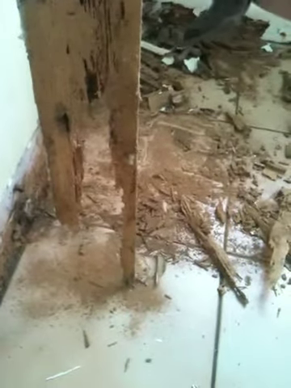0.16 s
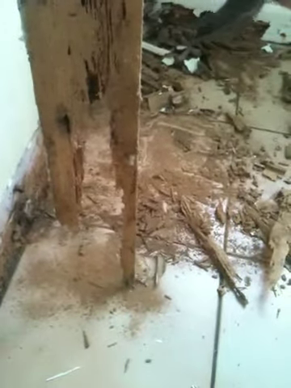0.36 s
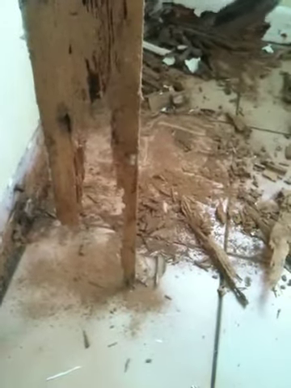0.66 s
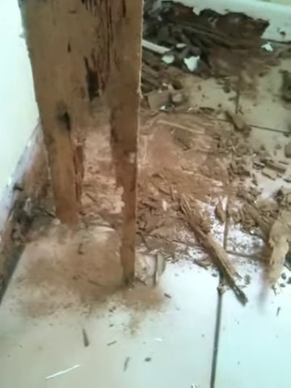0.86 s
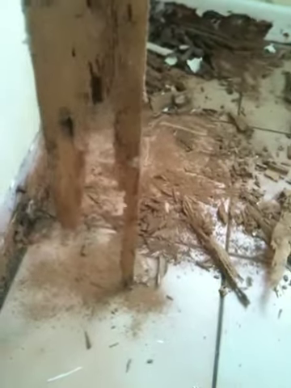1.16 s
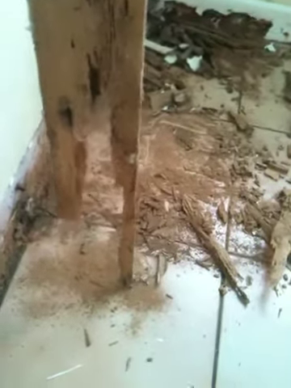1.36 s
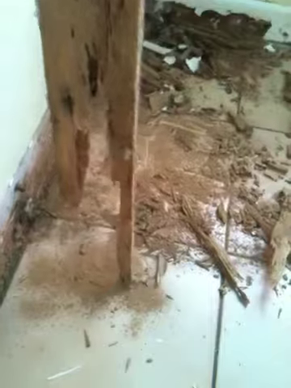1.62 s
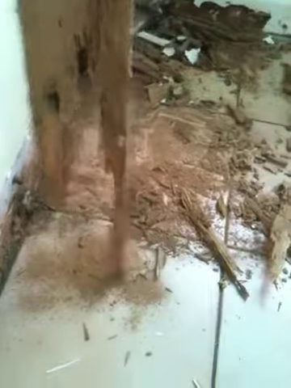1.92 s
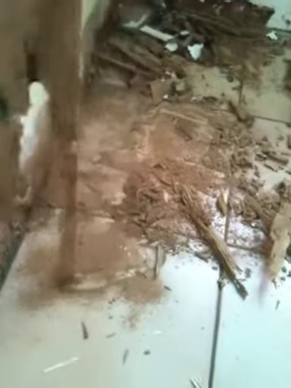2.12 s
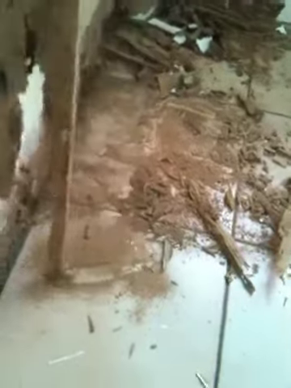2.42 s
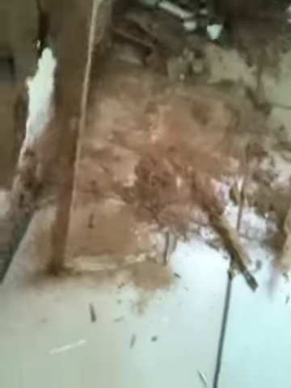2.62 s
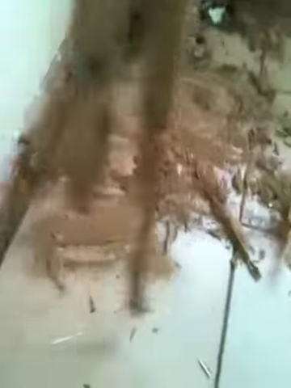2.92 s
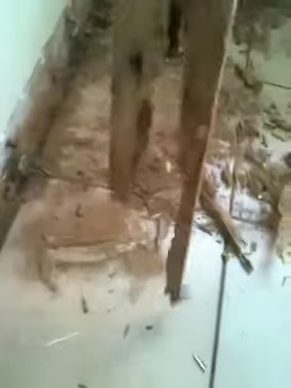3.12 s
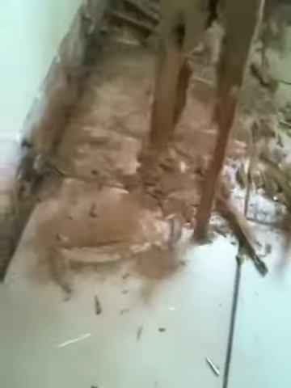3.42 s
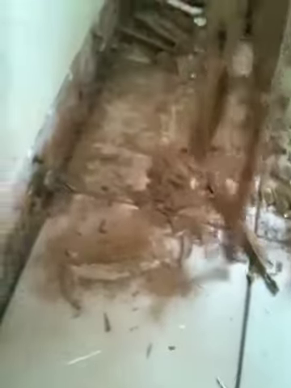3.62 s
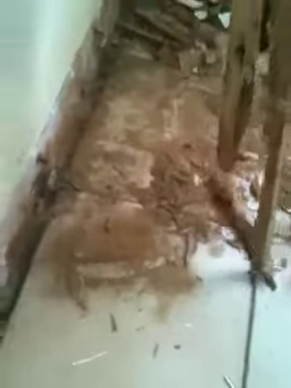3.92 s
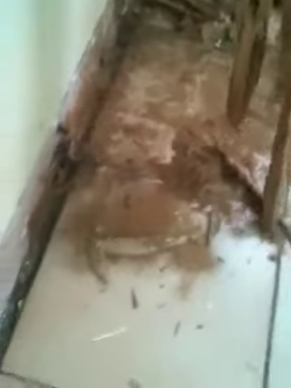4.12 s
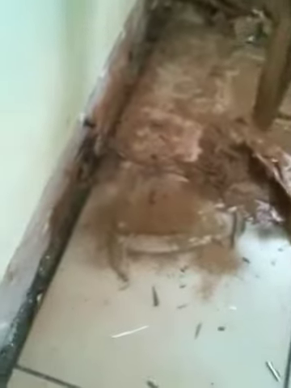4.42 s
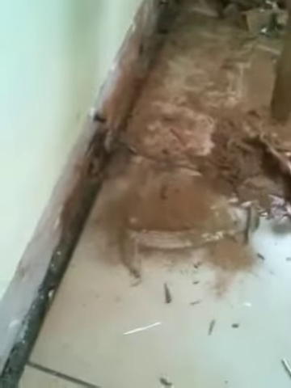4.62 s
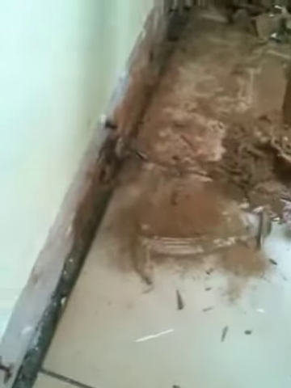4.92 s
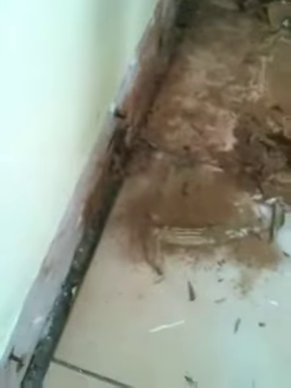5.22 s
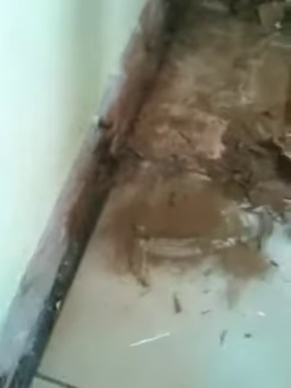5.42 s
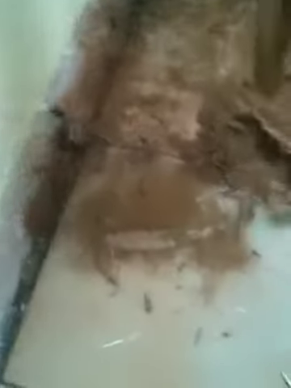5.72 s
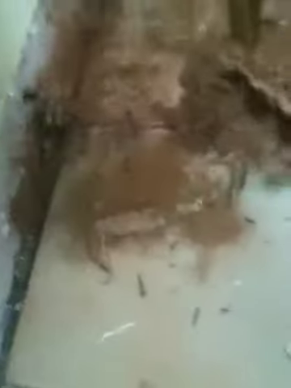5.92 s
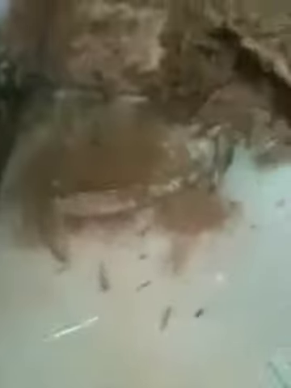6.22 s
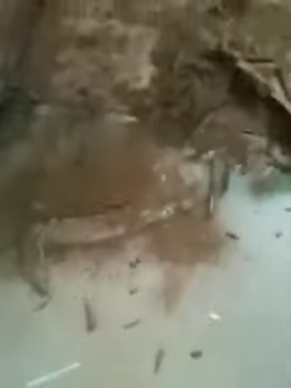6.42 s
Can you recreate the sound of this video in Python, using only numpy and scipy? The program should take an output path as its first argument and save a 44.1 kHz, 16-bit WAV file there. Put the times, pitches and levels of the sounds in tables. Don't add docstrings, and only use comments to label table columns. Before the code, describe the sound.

Rotted wooden frame cracks, creaks, drags and clatters over gritty tile in a small bare room, then a shoe scuffs and a steel scraper drops and bounces.

```python
import sys
import numpy as np
from scipy import signal
from scipy.fft import rfft, irfft, next_fast_len
from scipy.io import wavfile
from scipy.ndimage import uniform_filter1d, minimum_filter1d

SR = 44100
rng = np.random.default_rng(int(sys.argv[2]) if len(sys.argv) > 2 else 0)


def wav_out(sig):
    wavfile.write(sys.argv[1], SR, np.round(np.clip(np.atleast_2d(sig).T, -1, 1) * 32767).astype(np.int16))


def volts_from_db(level):
    exponent = np.asarray(level, float) / 20
    return 10 ** exponent


N = 289296

# pitch_hz, level_db (per Hz)
HUSH_COLOUR = [(15, -98), (25, -55), (117, -9.5), (181, -7.5), (280, -15), (347, -14), (377, -17),
               (420, -19), (666, -21), (1420, -25), (2880, -31.5), (15100, -34), (16400, -34)]
HUSH_DB = -68
# pitch_hz, level_db
ECHO_COLOUR = [(150, -16), (500, 0.5), (2000, -2), (6000, -1.5), (16000, -2)]
ECHO_T60_S, WOOD_ECHO_DB, TOOL_ECHO_DB = 0.19, -8.5, -19.5
MIC_LOW_HZ, TOP_HZ = 92, 16000

# time_s, level_db
SLIDE = [(5.86, -85), (5.9, -65), (5.94, -46), (5.962, -44.5), (6.032, -71), (6.06, -62)]
# pitch_hz, level_db (per Hz)
SLIDE_COLOUR = [(470, -53), (800, -2.5), (990, -21), (1170, -15.5), (2380, 2.5), (3020, -3), (5050, -2),
                (7170, 6.5), (12600, -5), (16000, -12.5)]
# time_s, level_db
CREEP = [(4.9, -91), (5.17, -73.5), (5.21, -66.5), (5.37, -59), (5.53, -67), (5.73, -66.5), (6.02, -66),
         (6.18, -69), (6.364, -70)]
# time_s, level_db
WEIGHT = [(4.9, -74.5), (5.1, -69), (5.5, -74.5), (5.75, -66.5), (6.364, -65)]
SOLE_WOOD_DB, SLIDE_WOOD_DB, SLIDE_GRIT_DB = -4.5, -22, -10

# start_s, peak_db, blade_share_db, hardness_db, rise_ms
BOUNCES = [
    (6.38, -27.5, -10, 3, 1),
    (6.3833, -2.5, -0.5, 0, 0.26),
    (6.438, -8, -7, -4.5, 0.97),
    (6.449, -24.5, -12, -3, .6),
    (6.475, -12, -20, -12, 0.96),
    (6.488, -33, -23, -14, 0.9),
    (6.499, -12, 1.5, 2, .7),
    (6.554, -26, 4, -1, .5),
]
# start_s, pitch_hz, level_db, t60_s
BLADE_TOUCHES = [(4.376, 5340, -63.5, 0.27), (4.37, 7240, -75, .2), (4.48, 5300, -72, 0.55),
                 (4.48, 7360, -69, .3), (4.505, 6589, -67, .2), (4.505, 11280, -71, .25),
                 (4.51, 8576, -79, 0.14), (6.24, 1265, -58, 0.5), (6.24, 3420, -64, 0.18),
                 (6.24, 5276, -60, 0.2), (6.24, 10190, -58, 0.1), (6.24, 11100, -61, 0.14),
                 (6.32, 5300, -69, 0.48), (6.385, 13670, -60, .15), (6.52, 5300, -42, .5),
                 (6.52, 766, -42, .12), (6.385, 12740, -55, .1), (6.385, 8258, -31, .08),
                 (6.439, 10201, -41, 0.1), (6.385, 11900, -34, .03), (6.476, 11300, -50, .04),
                 (6.5, 11300, -42, .05), (6.51, 12640, -56, .4), (6.5, 13670, -61, .06)]
HANDLE_HZ = [1110, 1660, 2400, 4380, 5150, 6900, 8500]
# level_db, t60_s
HANDLE_DECAY = [(-13, 0.076), (-2, 0.058), (-2, 0.047), (-1, 0.022), (-2.5, 0.025), (-7, 0.011),
                (-4.5, 0.0057)]
BLADE_HZ = [840, 1190, 1590, 2495, 3434, 5281, 5363, 6581, 7560, 8540, 10201, 11300, 12640, 13559]
# level_db, t60_s
BLADE_DECAY = [(-48, 0.085), (-47, 0.17), (-24.5, 0.24), (-35, 0.11), (-26, 0.42), (-34, 0.43), (-20, 0.17),
               (-17, 0.16), (-24, 0.13), (-26.5, 0.13), (-18, 0.28), (-28, 0.069), (-33, 0.05),
               (-36.5, 0.21)]
# pitch_hz, level_db (per Hz)
RATTLE_COLOUR = [(290, -47), (500, -24), (847, -17.5), (1130, 9.5), (1300, -7.5), (1650, 2), (1880, -9),
                 (2390, -1.5), (3770, -10.5), (4290, 0), (9650, -28), (12000, -33), (15000, -51)]
CONTACT_S = 0.0068

# start_s, peak_db, pitch_hz, t60_s
DRUMS = [(1.09, -35.5, 169.4, 0.15), (1.196, -52, 181, 0.073), (1.2332, -39, 183, 0.19),
         (1.417, -54, 114.5, 0.25), (1.519, -54.5, 194.3, 0.42), (1.959, -46.5, 179.6, 0.29),
         (1.998, -47, 186, 0.11), (2.084, -42, 181.6, 0.48), (2.114, -37, 178.2, 0.11),
         (2.265, -43.5, 148, 0.3), (2.418, -42.5, 184, 0.69), (2.502, -31.5, 687, 0.1),
         (2.512, -51, 667, .3), (2.53, -48.5, 144, 0.23), (2.64, -49, 678, 0.18), (2.872, -48.5, 675, 0.14),
         (3.999, -65, 137, 0.18), (5.555, -52.5, 120, 0.041), (6.382, -40, 217, 0.022),
         (6.433, -53, 296, 0.28), (6.441, -46.5, 140, 0.098), (6.502, -50, 178, 0.21)]
# start_s, peak_db, pitch_hz, t60_s
KNOCKS = [(1.09, -28, 279, 0.045), (1.104, -37, 670, 0.12), (1.309, -44.5, 192.4, 0.44),
          (1.374, -52, 670, 0.18), (2.464, -36.5, 157.4, 0.15), (2.637, -42, 144, 0.18),
          (3.425, -49.5, 184, 0.17), (3.499, -49.5, 165, 0.15), (3.898, -62, 730, .2),
          (3.993, -58, 374, 0.19), (4.228, -54.5, 170, 0.089), (5.392, -58, 308, 0.14),
          (6.503, -43.5, 716, 0.13), (6.529, -46.5, 205.7, 0.24)]
# start_s, peak_db, pitch_hz
TAPS = [(1.232, -41.5, 250), (2.647, -54, 307), (4.223, -52, 318), (4.23, -45, 256), (4.232, -57, 453),
        (4.243, -49, 290), (1.0927, -46, 457), (1.1, -28.5, 323), (3.429, -49.5, 398), (3.5, -48, 350),
        (4.39, -56, 600), (4.456, -54.5, 640), (4.54, -59, 250), (5.709, -56.5, 477), (6.042, -52, 530),
        (6.077, -55, 393), (6.196, -40, 345), (6.198, -50, 660), (6.2, -37.5, 214), (6.216, -48, 820),
        (6.216, -43.5, 485), (6.243, -53, 720), (6.549, -32.5, 864), (6.387, -42, 423), (6.515, -33, 834)]
DRUM_BOARDS_DB, KNOCK_BOARDS_DB, TAP_BOARDS_DB = -7, 3.5, -10
TAP_T60_S = 0.02
TWIN_RATIO = .925

# time_s, level_db
STROKES = [
    [(1.475, -54.5), (1.5, -67), (1.512, -54), (1.557, -56), (1.689, -59.5), (1.95, -55)],
    [(1.95, -55.5), (2.084, -55), (2.14, -56), (2.23, -53), (2.4, -65)],
    [(2.5, -40.5), (2.616, -60.5), (2.744, -56.5), (2.804, -57.5), (2.926, -58), (2.992, -72), (3.1, -85)],
    [(3.25, -78.5), (3.366, -77.5), (3.522, -65), (3.684, -76.5), (3.89, -73)],
    [(3.91, -51), (3.97, -69), (4.072, -53.5), (4.108, -58.5), (4.18, -67)],
    [(4.18, -74), (4.268, -63.5), (4.35, -73), (4.548, -72.5), (4.72, -81), (4.9, -87.5)],
]
# grit_db, panel_db
STROKE_SHARES = [(-3.5, -10.5), (-3.5, -1.5), (-3.5, -5), (0.5, 3.5), (-2, -8), (-1, 5)]
# pitch_hz, level_db (per Hz)
WOOD_COLOUR = [(240, -35), (400, -3), (420, -1.5), (617, -5), (674, 5.5), (736, -14.5), (941, 4.5),
               (1280, 2), (1380, 3.5), (1570, 5), (1800, 2.5), (2070, 7.5), (2240, 5.5), (3590, -9),
               (4200, -4.5), (5460, -50), (9240, -120)]
# pitch_hz, level_db (per Hz)
GRIT_COLOUR = [(1880, -14.5), (3200, -16.5), (3640, -16.5), (6150, -10), (6940, -13), (8210, -9),
               (9530, -17), (10800, -13.5), (12100, -23), (14400, -21), (16000, -38)]
# pitch_hz, width_hz, level_db
PANEL_MODES = [(140, 28, 1.5), (174.4, 59, 5.5), (320, 60, 2.5), (670, 24, -7)]

# start_s, peak_db, squeak_share_db, squeak_hz
SLIPS = [(1.479, -45, -4, 4650), (1.508, -57, 2, 4700), (1.5158, -47.5, -1, 4910),
         (1.5412, -39.5, -3.5, 4800), (1.5622, -40, -7, 4550), (1.5817, -43.5, -5, 4950),
         (1.602, -46, -1, 4810), (1.625, -47, 2.5, 5100), (1.643, -45, -3, 4870), (1.6616, -52, 1, 4720),
         (1.6807, -45, -4, 4480), (1.702, -43, -7, 4820), (1.722, -41.5, -2, 4650), (1.7446, -40, -8, 4700),
         (1.7655, -39.5, -8, 4600), (1.7868, -37, -5.5, 5050), (1.8081, -45, 0, 4550),
         (1.828, -46, -7, 4400), (1.848, -51.5, 5, 4500), (1.8687, -56, -4, 4390), (1.8877, -51, -2, 4800),
         (1.901, -54, 6, 4610), (1.9084, -38.5, -11, 4750), (1.923, -42.5, -9, 4950),
         (1.932, -37.5, -7, 4530)]
# pitch_hz, width_hz, level_db
JOINT_MODES = [(1026, 88, -6.5), (1400, 74, 2), (1950, 160, -1.5), (2600, 260, 5.5), (3100, 330, -5)]
SLIP_RISE_S, SLIP_SCRAPE_S = .003, .004
CATCH_S, CATCH_DB = .009, -5.5

# start_s, peak_db, pitch_hz, splinter_share_db, t60_s
SNAPS = [(0.63, -62, 2370, 0.5, 0.3), (0.7, -61.5, 2680, 1, 0.23), (1.0917, -26.5, 2070, 0, 0.15),
         (1.0984, -22.5, 1310, -6.5, 0.17), (1.1045, -34, 810, -13, 0.061), (1.1104, -28, 2040, -1.5, 0.14),
         (1.122, -38, 1400, -13, 0.23), (1.141, -45, 2160, 1.5, 0.45), (1.307, -47, 3000, 12.5, 0.023),
         (1.3085, -35.5, 1200, -5, 0.1), (1.315, -41, 2500, 0, 0.052), (1.3728, -45.5, 2980, 12, .025),
         (1.31, -45, 2820, -10.5, 0.093), (1.374, -34, 1370, -4, 0.13), (1.954, -35, 1570, -5, 0.11),
         (2.1, -44.5, 2170, -17.5, 1), (2.209, -48.5, 2070, -13.5, 0.24), (2.4026, -44, 2540, 9.5, 0.1),
         (2.4076, -26, 2600, -1, 0.059), (2.4082, -42, 2730, -5, 0.042), (2.4104, -14, 2870, -1, 0.017),
         (2.413, -26, 2700, -13, 0.033), (2.417, -24.5, 2120, 6, 0.038), (2.4343, -29, 2040, -0.5, 0.17),
         (2.4571, -24.5, 1600, -5, 0.13), (2.4715, -28, 1900, -10, 0.06),
         (2.487, -22.5, 1900, -18.5, 0.049), (2.503, -30.5, 1690, 1, 0.069),
         (2.519, -44.5, 1900, -4, 0.082), (2.6129, -25.5, 1810, -3.5, 0.096),
         (3.4291, -33.5, 1900, -3, .05), (3.4339, -33, 1760, -3, 0.024), (3.479, -33.5, 2080, 1, 0.04),
         (3.896, -37, 3300, -24, 0.086), (3.899, -33.5, 1700, -0.5, 0.082), (3.99, -39.5, 2680, -1, 0.051),
         (4.029, -43, 1180, -1, 0.11), (4.075, -44, 2300, -12, 0.25), (4.09, -43, 1900, -1.5, 0.18),
         (4.105, -49, 2120, 6.5, 0.17)]
# start_s, peak_db, pitch_hz
CRUMBS = [(0.168, -57, 1650), (0.65, -60, 2300), (0.72, -59, 2500), (0.81, -61, 1500), (0.775, -57.5, 1440),
          (1.234, -47.5, 1950), (1.978, -38, 2190), (2.036, -46, 1900), (2.088, -42, 2180),
          (2.173, -39.5, 1890), (2.221, -43, 1900), (2.3, -47, 2600), (2.693, -55, 1940),
          (2.7117, -41, 1750), (2.7783, -43.5, 1980), (2.796, -39.5, 1900), (2.82, -34.5, 2110),
          (2.844, -40, 1940), (2.8705, -35, 2300), (2.8946, -36, 1560), (2.932, -50.5, 1400),
          (4.266, -50, 1680), (4.4577, -56.5, 1740), (6.238, -50, 1200)]
# start_s, peak_db, splinter_share_db, t60_s, click_db
CHIPS = [(0.787, -56, -8, 0.15, -70), (1.9944, -41.5, 4, 0.49, -22.5), (2.066, -39, 2, 0.33, -58),
         (2.1501, -31, -1.5, 0.084, -39.5), (2.1935, -37, 1, 0.0677, -42.5),
         (2.4674, -24, -5.5, 0.073, -12), (2.4812, -22, -5, 0.1, -12), (2.497, -29, 2, 0.1, -13.5),
         (2.6403, -37, -0.5, 0.11, -50), (3.4019, -36.5, -2.5, 0.16, -28), (3.4226, -36.5, 1, 0.05, -15),
         (3.468, -28, 1.5, 0.078, -13.5), (3.5002, -26, 0, 0.14, -14.5), (3.5175, -42.5, 8, 0.28, -16.5),
         (3.993, -37.5, 5, 0.19, -10), (3.9961, -35, -11, 0.038, -13.5), (4.192, -42.5, 5, 0.07, -49),
         (4.2288, -44, 7, 0.1, -22.5), (4.012, -51, 1, .1, -36), (4.049, -50, 3, .1, -37)]
# start_s, peak_db
TICKS = [(1.7228, -45), (2.0654, -28.5), (2.151, -36.5), (2.1938, -51), (2.7141, -43), (2.779, -38),
         (2.796, -28), (2.8187, -41), (2.8488, -48), (2.872, -54), (3.429, -27), (3.481, -33), (3.532, -28),
         (2.409, -33), (2.4155, -23.5), (1.5095, -39), (1.308, -56), (1.3735, -43), (2.6135, -22),
         (3.332, -37), (4.3124, -50), (4.3982, -38), (5.3668, -29), (6.0444, -56), (6.058, -54)]
# pitch_hz, level_db (per Hz)
PIECE_COLOUR = [(290, -56.5), (500, -5.5), (618, 0), (757, -9.5), (1060, -2.5), (1210, -7), (1890, -3.5),
                (3060, -8.5), (5000, -19), (6500, -54.5), (11000, -120)]
# pitch_hz, level_db (per Hz)
SPLINTER_COLOUR = [(1650, -31.5), (2800, -12.5), (3290, -1.5), (4030, -4.5), (4470, -0.5), (5810, -6),
                   (8180, -2.5), (9400, -7), (14600, -14.5), (16000, -25.5)]
SNAP_SPLINTER_HZ = 4810
CRUMB_SPLINTER_DB, CRUMB_SPLINTER_HZ, CRUMB_T60_S = -7, 5000, 0.086
CHIP_HZ, CHIP_SPLINTER_HZ = 2020, 7180
CLICK_HZ, CLICK_S, CLICK_RISE_S = 7640, 0.00092, 0.00019


def colour(x, points):
    hz, db = np.transpose(points)
    size = next_fast_len(len(x) + 4096, True) // 2 * 2
    f = np.maximum(np.arange(size // 2 + 1) * SR / size, 1)
    response_db = np.interp(np.log(f), np.log(hz), db)
    cepstrum = irfft(np.log(volts_from_db(response_db)), size)
    cepstrum[1:size // 2] *= 2
    cepstrum[size // 2 + 1:] = 0
    return irfft(rfft(x, size) * np.exp(rfft(cepstrum)), size)[:len(x)]


def unit(x):
    return x / np.sqrt(np.mean(x ** 2))


def peak(x, db):
    return x * volts_from_db(db) / np.max(np.abs(x))


def ring(x, hz, width):
    return signal.lfilter(*signal.iirpeak(hz, hz / width, fs=SR), x)


def add(track, s, x):
    i = int(s * SR)
    track[i:i + len(x)] += x[:N - i]


def curve(rows):
    return volts_from_db(np.interp(np.arange(N) / SR, *np.transpose(rows), -150, -150))


def grains(size, rate, spread_db):
    hit = rng.random(size) < rate / SR
    strength_db = np.minimum(spread_db * rng.exponential(size=size), 9)
    return hit * rng.standard_normal(size) * volts_from_db(strength_db)


def modes(table, t, scatter_db):
    hz, db, t60 = np.array(table).T[:, :, None]
    gain = volts_from_db(db + scatter_db * rng.standard_normal(db.shape))
    return np.sum(gain * np.sin(2 * np.pi * hz * t) * volts_from_db(-60 * t / t60), axis=0)


def hush():
    return volts_from_db(HUSH_DB) * unit(colour(rng.standard_normal(N), HUSH_COLOUR))


def room(x):
    t = np.arange(SR // 2) / SR
    onset = np.clip((t - .004) / 0.00061, 0, 1)
    tail = colour(rng.standard_normal(len(t)), ECHO_COLOUR) * volts_from_db(-60 * t / ECHO_T60_S) * onset
    return signal.fftconvolve(x, tail / np.sqrt(np.sum(tail ** 2)))[:N]


def grind(on_wood, on_grit, on_panel, flutter_db):
    flutter = unit(uniform_filter1d(rng.standard_normal(N), size=SR // 60))
    drag = volts_from_db(flutter_db * flutter)
    wood = unit(colour(drag * grains(N, 8400, 0.49), WOOD_COLOUR))
    grit = unit(colour(drag * grains(N, 10000, 1.5), GRIT_COLOUR))
    push = rng.standard_normal(N)
    panel = np.zeros(N)
    for hz, width, db in PANEL_MODES:
        panel += volts_from_db(db) * unit(ring(ring(push, hz, width), hz, 3 * width))
    return wood * on_wood + grit * on_grit + unit(panel) * on_panel


def shoe():
    creep, slide = curve(CREEP), curve(SLIDE)
    hiss = unit(colour(rng.standard_normal(N), SLIDE_COLOUR)) * slide
    on_wood = volts_from_db(SOLE_WOOD_DB) * creep + volts_from_db(SLIDE_WOOD_DB) * slide
    on_grit = creep + volts_from_db(SLIDE_GRIT_DB) * slide
    return hiss + grind(on_wood, on_grit, curve(WEIGHT), 0.22)


def scraper():
    out, t = np.zeros(N), np.arange(SR // 2) / SR
    spring = 0.48 * np.exp(-(t / CONTACT_S) ** 6) + 0.31
    rattle_decay = 0.22 * np.exp(-t / 0.0091) + 0.078 * np.exp(-t / 0.046)
    handle_modes = np.column_stack([HANDLE_HZ, HANDLE_DECAY])
    blade_modes = np.column_stack([BLADE_HZ, BLADE_DECAY])
    gaps = np.diff([bounce[0] for bounce in BOUNCES], append=N / SR)
    for (s, db, blade_db, hard_db, rise_ms), gap in zip(BOUNCES, gaps):
        rattle = unit(colour(rng.standard_normal(len(t)), RATTLE_COLOUR)) * rattle_decay
        handle = spring * (modes(handle_modes[:3], t, 0) + volts_from_db(hard_db) * modes(handle_modes[3:], t, 0))
        choke = np.where(t < gap, 1, .4)
        blade = volts_from_db(blade_db) * choke * modes(blade_modes, t, 1.2)
        rise = 1 - np.exp(-t / (rise_ms / 1000))
        add(out, s, peak((handle + blade + rattle) * rise, db))
    for s, *mode in BLADE_TOUCHES:
        add(out, s, modes([mode], t, 0) * (1 - np.exp(-t / 0.0051)))
    return out


def thuds():
    out, t = np.zeros(N), np.arange(SR // 2) / SR
    rows = [(*row, DRUM_BOARDS_DB) for row in DRUMS]
    rows += [(*row, KNOCK_BOARDS_DB) for row in KNOCKS]
    rows += [(*row, TAP_T60_S, TAP_BOARDS_DB) for row in TAPS]
    for s, db, hz, t60, boards_db in rows:
        panel = modes([(hz, 0, t60), (1.72 * hz, -12, t60)], t, 0)
        drum = panel - modes([(TWIN_RATIO * hz, -6, t60)], t, 0)
        jolt = rng.standard_normal(len(t)) * volts_from_db(-60 * t / min(t60, .1))
        knock = ring(ring(jolt, 380, 550), 380, 800)
        add(out, s, peak(drum * (1 - np.exp(-t / 0.002)), db) + peak(knock, db + boards_db))
    return out


def drags():
    press = np.array([curve(stroke) for stroke in STROKES])
    on_grit, on_panel = volts_from_db(np.transpose(STROKE_SHARES)) @ press
    return grind(press.sum(axis=0), on_grit, on_panel, 1.6)


def creak():
    out, t = np.zeros(N), np.arange(SR // 10) / SR
    for s, db, squeak_db, squeak_hz in SLIPS:
        slip = rng.standard_normal(len(t)) * np.exp(-t / SLIP_SCRAPE_S) * (1 - np.exp(-t / SLIP_RISE_S))
        slip[SR // 250] += 1.5
        slip = slip + volts_from_db(CATCH_DB) * rng.random() * np.roll(slip, int(CATCH_S * SR))
        low = np.zeros(len(t))
        for hz, width, mode_db in JOINT_MODES:
            low += volts_from_db(mode_db) * unit(ring(ring(slip, hz, width), hz, 4 * width))
        squeak = ring(ring(slip, squeak_hz, 610), squeak_hz, 1300)
        add(out, s, peak(low, db) + peak(squeak, db + squeak_db))
    return out


def clicks():
    out, t = np.zeros(N), np.arange(SR // 4) / SR
    for s, db in TICKS + [(row[0], row[-1]) for row in CHIPS]:
        click = rng.standard_normal(len(t)) * np.exp(-t / CLICK_S) * (1 - np.exp(-t / CLICK_RISE_S))
        for width in (CLICK_HZ, CLICK_HZ, 2 * CLICK_HZ):
            click = ring(click, CLICK_HZ, width)
        add(out, s, peak(click, db - 10.5))
    return out


def cracks():
    out, t = np.zeros(N), np.arange(SR // 4) / SR
    rows = [(s, db, hz, share, SNAP_SPLINTER_HZ, t60) for s, db, hz, share, t60 in SNAPS]
    rows += [(*row, CRUMB_SPLINTER_DB, CRUMB_SPLINTER_HZ, CRUMB_T60_S) for row in CRUMBS]
    rows += [(s, db, CHIP_HZ, share, CHIP_SPLINTER_HZ, t60) for s, db, share, t60, _ in CHIPS]
    for s, db, hz, treble_db, treble_hz, t60 in rows:
        shower = grains(len(t), 16000, 1.5) * volts_from_db(-60 * t / t60)
        snap = rng.standard_normal(len(t)) * np.exp(-t / 0.004)
        body = ring(ring(shower + 0.52 * snap, hz, 0.5 * hz), hz, 2.07 * hz)
        body = colour(body, PIECE_COLOUR)
        spit = shower * volts_from_db(-20 * t / t60) + 0.27 * snap
        splinter = colour(.4 * spit + ring(spit, treble_hz, 0.62 * treble_hz), SPLINTER_COLOUR)
        add(out, s, peak(body, db) + peak(splinter, db + treble_db))
    return out


def scene():
    wood = cracks() + clicks() + creak() + thuds()
    tool = scraper()
    wet = room(volts_from_db(WOOD_ECHO_DB) * wood + volts_from_db(TOOL_ECHO_DB) * tool)
    near = wood + tool + wet + drags() + shoe()
    near = signal.sosfilt(signal.butter(1, MIC_LOW_HZ, "high", fs=SR, output="sos"), near)
    return (near + hush())[None]


def low_pass(x):
    return signal.sosfilt(signal.butter(12, 16050, fs=SR, output="sos"), x)


def record(dry):
    level = uniform_filter1d(np.abs(dry), size=SR // 400) + 1e-9
    ahead = np.roll(-minimum_filter1d(-level, size=SR // 110), -SR // 130, axis=1)
    gain = np.clip((14 * level / ahead) ** 3, .05, 1)
    gain = uniform_filter1d(gain, size=SR // 800)
    bass = signal.sosfiltfilt(signal.butter(2, 700, fs=SR, output="sos"), dry)
    gated = bass + gain * (dry - bass)
    mix = signal.sosfilt(signal.ellip(8, .2, 60, TOP_HZ, fs=SR, output="sos"), gated)
    return low_pass(mix)


dry = scene()
out = record(dry)
wav_out(out)
```